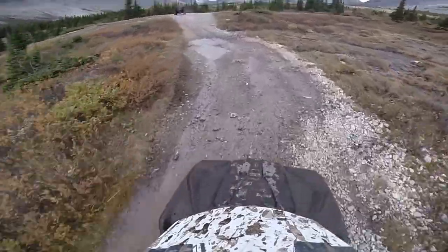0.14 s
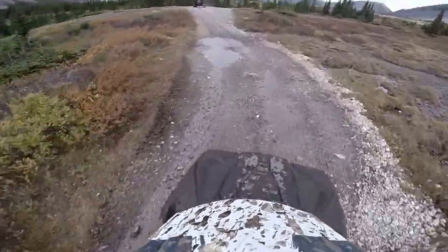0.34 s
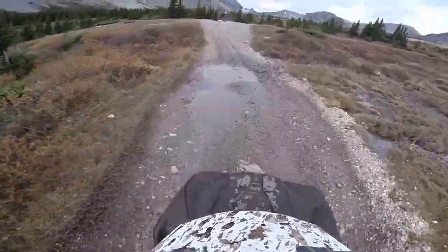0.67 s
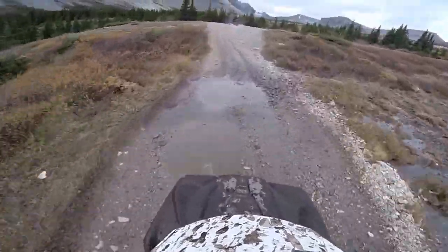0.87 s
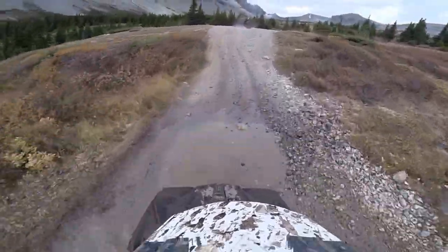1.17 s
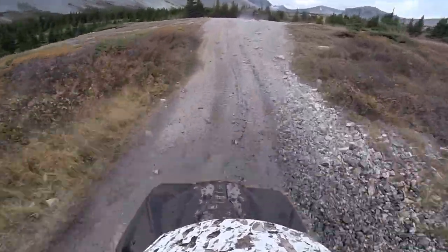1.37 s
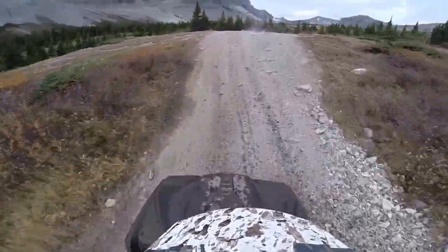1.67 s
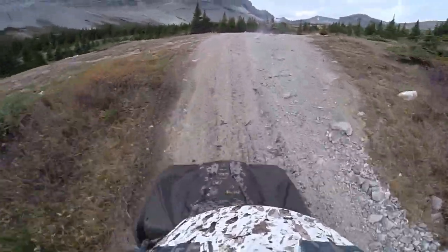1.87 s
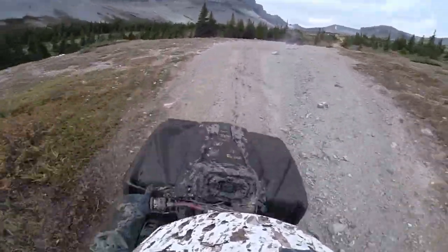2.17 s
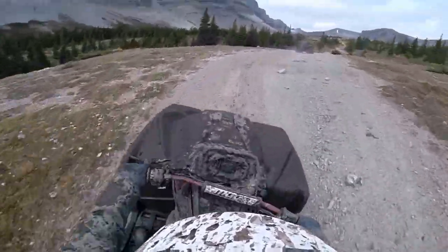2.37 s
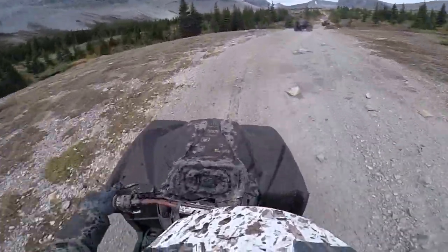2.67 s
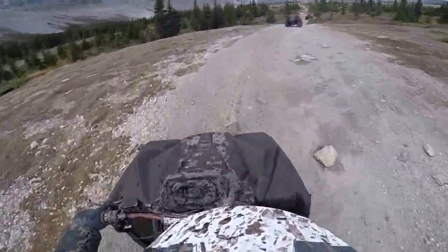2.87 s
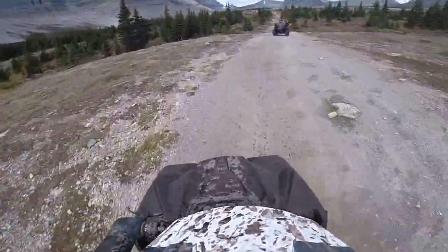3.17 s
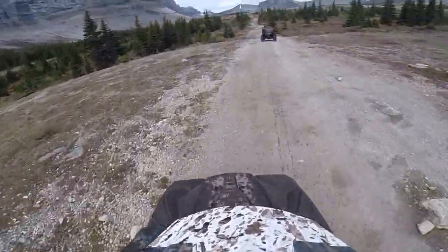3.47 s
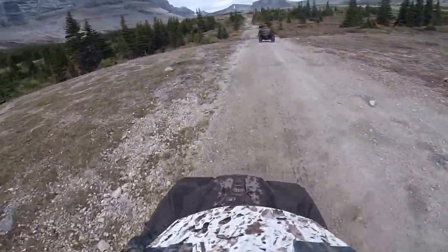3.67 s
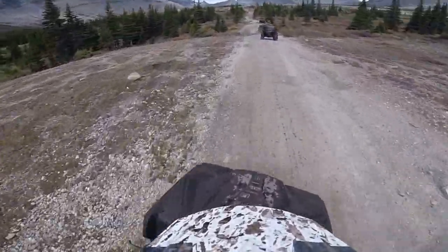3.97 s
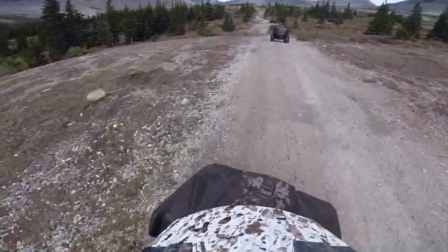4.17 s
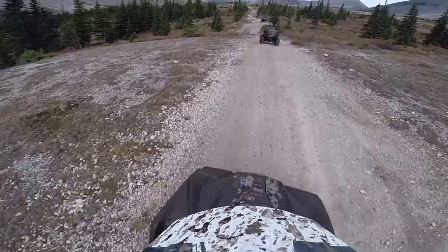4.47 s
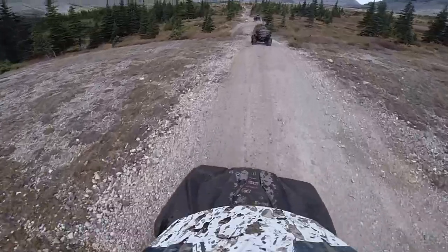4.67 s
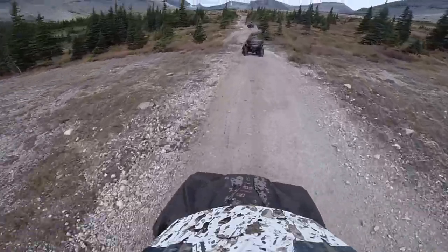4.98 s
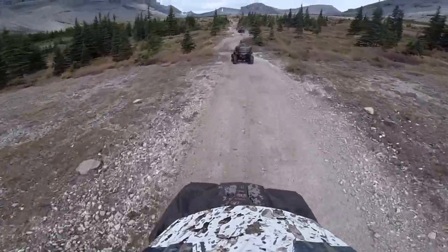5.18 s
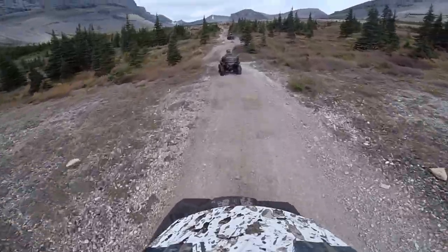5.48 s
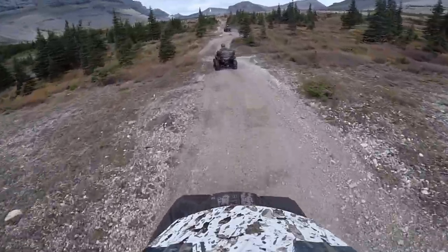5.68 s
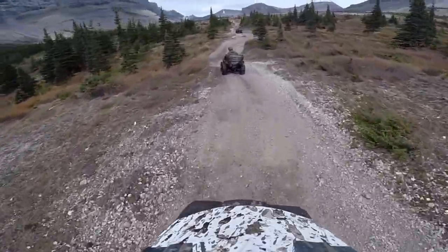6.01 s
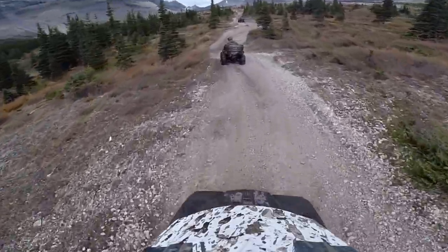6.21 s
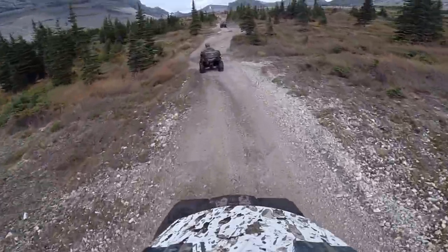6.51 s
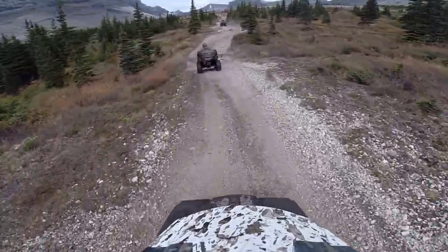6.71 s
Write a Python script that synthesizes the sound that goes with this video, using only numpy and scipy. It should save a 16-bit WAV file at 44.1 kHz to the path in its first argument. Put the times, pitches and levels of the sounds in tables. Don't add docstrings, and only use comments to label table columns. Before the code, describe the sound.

A quad engine, close and boxy through a closed camera case on the helmet, runs along an open gravel trail. From 0 to 2 s the throttle is blipped in short bursts, uneven firing throbbing and barking with a raspy intake, while low bumps thud and grit hisses. Stones clatter lightly near 0.7 and 1.0 s. From 2.0 to 2.8 s the revs climb highest, with a hard stone knock at 2.25. They drop to a low growl by 3.4, with a dull rap near 3.15, then surge until 3.9. Two shorter blips follow, ending near 4.7, with stones around 4.3. After that the throttle stays shut: a sharp panel hit at 4.9, then the chug sinks steadily, a loose part taps rapidly, and faint gear whines slide mostly downward. Bumps fade, returning softly after 6.4. Light hiss continues until the end near 6.9 s.

```python
import sys
import numpy as np
from scipy import signal
from scipy.io import wavfile
from scipy.ndimage import uniform_filter1d

SR = 44100
rng = np.random.default_rng(int(sys.argv[2]) if len(sys.argv) > 2 else 0)


def natural_amplitude(level_db):
    exponent = np.asarray(level_db, float) / 20
    return 10 ** exponent


def digitize_waveform(pressure):
    field = np.atleast_2d(pressure).T
    bounded = np.clip(field, -1, 1)
    quanta = np.round(bounded * 32767).astype(np.int16)
    wavfile.write(sys.argv[1], SR, quanta)


N = 302085


def rms_one(x):
    return x / np.sqrt(np.mean(x ** 2) + 1e-20)


def drift(rate):
    r = np.exp(-80 * np.pi * rate / SR)
    slow = signal.lfilter([1], [1, -2 * r, r * r], rng.standard_normal(N // 40 + 2002))[2000:]
    return np.interp(np.arange(N) / 40, np.arange(len(slow)), rms_one(slow))


def resonate(x, hz, width_hz):
    r = np.exp(-np.pi * width_hz / SR)
    poles = [1, -2 * r * np.cos(2 * np.pi * hz / SR), r * r]
    return signal.lfilter([(1 - r * r) / 2, 0, (r * r - 1) / 2], poles, x)


def ring(clicks, hz, t60):
    r, w = natural_amplitude(-60 / (t60 * SR)), 2 * np.pi * hz / SR
    return signal.lfilter([0, np.sin(w)], [1, -2 * r * np.cos(w), r * r], clicks + 1e-18)


def cut(x, hz, kind, order=4):
    return signal.sosfilt(signal.butter(order, hz, kind, fs=SR, output="sos"), x)


def evened(x, share=1):
    x = rms_one(x)
    return x / (uniform_filter1d(x ** 2, size=3500) + 1e-12) ** (np.clip(share, 0, 1) / 2)


def banded_noise(spectrum, patchy_db):
    hz, db = np.transpose(spectrum)
    edges = hz[0] * 2 ** np.arange(0, np.log2(hz[-1] / hz[0]), 1 / 4)
    out, white = 0, rng.standard_normal((2, N))
    for k, (low, high) in enumerate(zip(edges, edges[1:])):
        level_db = np.interp(np.log(low * high) / 2, np.log(hz), db) + patchy_db * drift(9.7)
        out = out + natural_amplitude(level_db) * cut(white[k % 2], [low, high], "band", order=2)
    return rms_one(out)


# opens in seconds, shuts in seconds, cycles per s on opening,
# cycles per s aimed at on shutting.
BLIPS = [(-.2, -.02, 41, 42.1), (.1, .245, 38.6, 43.2), (.5, .71, 36.4, 44.2), (.715, .92, 43.9, 46.2),
         (1.06, 1.215, 40.4, 45), (1.35, 1.45, 39.2, 40.9), (1.66, 1.865, 39.9, 42.9),
         (1.98, 2.46, 38.8, 54.2), (2.57, 2.8, 49.4, 49.6), (3.43, 3.87, 30.2, 47.7),
         (4.055, 4.245, 38, 43.1), (4.46, 4.665, 34.2, 37.9)]
EASED_UNTIL_S = 2.7


def glide(s, length, tau):
    return (1 - np.exp(-np.clip(s, 0, length) / tau)) / (1 - np.exp(-length / tau))


def revs():
    climb_s, eased_drop_s, shut_drop_s = 1.2, .6, .14
    coast_hz, sag_hz_per_s = 30.8, 2.3
    belt_holds_hz, flywheel_s = 49.4, .04
    now = np.arange(N) / SR
    out = np.zeros(N)
    following = BLIPS[1:] + [(N / SR, 0, coast_hz, 0)]
    for (opens, shuts, low, high), (reopens, _, end, _) in zip(BLIPS, following):
        drop_s = eased_drop_s if shuts < EASED_UNTIL_S else shut_drop_s
        climb = low + (high - low) * glide(now - opens, shuts - opens, climb_s)
        drop = high + (end - high) * glide(now - shuts, reopens - shuts, drop_s)
        out = np.where(now >= opens, climb, out)
        out = np.where(now >= shuts, drop, out)
    last_shut = BLIPS[-1][1]
    out = np.minimum(out - sag_hz_per_s * np.maximum(now - last_shut, 0), belt_holds_hz)
    return uniform_filter1d(out, size=round(flywheel_s * SR))


PUSH = [0.12, 1.08, 0.94, 0.96, 0.81, 1.34, 0.89, 1.16, 0.67, 0.9, 0.98, 1.2]


def opening():
    ahead_s, open_s, shut_s = 0.018, 0.091, .065
    now = np.arange(N) / SR + ahead_s
    pushes = []
    for share, (opens, shuts, _, _) in zip(PUSH, BLIPS):
        travel = np.minimum((now - opens) / open_s, 1 + (shuts - now) / shut_s)
        pushes.append(share * np.clip(travel, 0, 1))
    return np.max(pushes, axis=0)


# time in seconds, peak in dB.
LOUD_TAPS = [(4.767, -32), (5.056, -31), (5.2574, -33.5), (5.292, -36), (5.326, -31.5), (5.361, -34),
             (5.4636, -34.5), (5.498, -31.5), (5.567, -33), (5.637, -29.5), (5.7777, -30.5), (5.8122, -36),
             (5.919, -35), (5.955, -32), (6.026, -37), (6.1, -38), (6.137, -35), (6.1734, -35),
             (6.2486, -34.5), (6.286, -35.5), (6.3619, -34), (6.4, -33), (6.436, -35.5), (6.5488, -34.5),
             (6.587, -32.5), (6.625, -32.5), (6.7013, -31), (6.818, -35)]


def crank(per_s):
    cycles = np.cumsum(per_s * (1 + 0.00147 * drift(7.2))) / SR
    at = np.round(np.array(LOUD_TAPS)[:, 0] * SR).astype(int)
    whole = np.cumsum(np.round(np.diff(cycles[at], prepend=cycles[at[0]])))
    nudge = np.interp(np.arange(N), at, whole - cycles[at])
    return cycles + uniform_filter1d(nudge, size=4000, mode="nearest")


# time in seconds, gain in dB.
LEAN = [(0, 1), (.4, 0.5), (.6, 1), (1.0, 0), (1.14, 1.5), (1.3, 1), (1.55, 2), (1.9, 1), (2.3, 2),
        (2.74, 1), (2.84, 1.6), (3.1, 3), (3.4, 2.5), (3.8, 1.15), (4.3, 0), (4.55, -0.5), (5.0, 0.5),
        (6.85, 0)]


def level(law, pushed, per_s):
    shut_db, open_db, db_per_rev, lean_share = law
    s, lean_db = np.transpose(LEAN)
    lean = np.interp(np.arange(N) / SR, s, lean_db)
    return shut_db + open_db * pushed + db_per_rev * (per_s - 40) + lean_share * lean


BLOWS_PULLING = [(0, 1.0), (.16, 1.29), (.54, 1.11)]
BLOWS_COASTING = [(.02, 1.2), (.14, .9), (.24, -.5), (.38, .6), (.47, .65), (.57, -.6), (.93, -.3)]


def lead(k, blows):
    place, height = np.transpose(blows)
    return np.angle(np.sum(height * np.exp(-2j * np.pi * k * place)))


# frequency in Hz, width in Hz, strength of the phase turn.
TURNS = [(88, 24, -2.23), (269, 12, 1.98), (462, 23, 1.08)]


def turned(hz):
    return sum(strength * np.arctan((hz - at) / width) for at, width, strength in TURNS)


# frequency in Hz, gain in dB.
SILENCER = [(20, -17), (60, 13), (100, 6.5), (135, -8.5), (150, -14), (161, -25), (168, -10), (178, -7.5),
            (192, -2.5), (215, 4.5), (245, -2), (275, -4.5), (310, -3), (380, -8), (440, -8.5),
            (520, -18.5), (1200, -21)]


def silencer_db(hz):
    return np.interp(hz, *np.transpose(SILENCER))


def order_db(k, pattern, rate_hz, otherwise=None):
    if k not in dict(pattern):
        return otherwise
    return dict(pattern)[k] - silencer_db(k * rate_hz)


PULLING_HZ, FREE_HZ, LUGGING_HZ, CRAWLING_HZ = 49.3, 46.5, 41.5, 36.5
# order, level in dB.
PULLING = [(1, -16), (2, -4), (3, -12), (4, -7.5), (5, 6), (6, 1.5), (7, -20.5), (8, -3), (9, -1.5),
           (10, -10.5), (11, -5.5), (12, -10), (13, -5), (14, -6.5), (15, -68), (16, -9), (17, -35),
           (18, -48), (19, -13), (20, -36), (21, -22), (22, -26), (23, -41), (24, -20)]
# order, level in dB.
LUGGING = [(1, -10), (2, -4), (3, -1), (4, -16), (5, 4.5), (6, 0), (7, 0), (8, -0.5), (9, -2.5), (10, -22),
           (11, -9.5), (12, -15), (13, -29), (14, -6.5), (15, -16), (16, -7), (17, -9), (18, -23),
           (19, -18), (20, -19), (21, -17), (22, -11.5), (23, -44), (24, -30)]
# order, level in dB.
CRAWLING = [(1, -10), (2, 0), (3, -6.5), (4, -3.5), (5, -6), (6, 13.5), (7, 0.5), (8, 4.5), (9, -3.5),
            (10, -17), (11, 1), (12, -5.5)]


def load_db(k, revs_hz):
    free = order_db(k, PULLING, PULLING_HZ)
    low = order_db(k, LUGGING, LUGGING_HZ)
    lowest = order_db(k, CRAWLING, CRAWLING_HZ, low - 1.5)
    return np.interp(revs_hz, [CRAWLING_HZ, LUGGING_HZ, FREE_HZ], [lowest, low, free])


# order, level in dB.
EASED = [(1, -11.5), (2, -8.5), (3, -14), (4, -24.5), (5, -6), (6, 1.5), (7, -10), (8, -10.5), (9, -14),
         (10, -24), (11, -5), (12, -15.5), (13, -52), (14, -17), (15, -42), (16, -12.5), (17, -24),
         (18, -41), (19, -29), (20, -45), (21, -31), (22, -20), (23, -24), (24, -54)]


def rest_db(k, revs_hz):
    eased = order_db(k, EASED, 40.2)
    held = order_db(k, PULLING, PULLING_HZ) - 1.5 * max(k - 6, 0)
    return np.interp(revs_hz, [FREE_HZ, PULLING_HZ], [eased, held]) - 0.5


IDLING_HZ, COASTING_HZ, OVERRUN_HZ, FALLING_HZ = 26.8, 28.9, 30.6, 37.5
# order, level in dB.
IDLING = [(1, -5), (2, -1), (3, 3), (4, -18), (5, -7.5), (6, -25), (7, -10), (8, -2), (9, -0.5), (10, -7.5),
          (11, -26), (12, -11.5), (13, -19), (14, -17.5), (15, -9.5), (16, -23), (17, -13), (18, -21)]
# order, level in dB.
COASTING = [(1, -36), (2, 1.5), (3, 5), (4, -15), (5, -3.5), (6, -8.5), (7, -1.5), (8, -2), (9, -3),
            (10, -7), (11, -10), (12, -15), (13, -24.5), (14, -11.5), (15, -7), (16, -28), (17, -36),
            (18, -21), (19, -53), (20, -18.5), (21, -32), (22, -21), (23, -18.5), (24, -37.5)]
# order, level in dB.
OVERRUN = [(1, -25), (2, -0.5), (3, 0.5), (4, -13), (5, -12), (6, 2), (7, -12), (8, -4.5), (9, 0), (10, -3),
           (11, -24), (12, -12)]
# order, level in dB.
FALLING = [(1, -10), (2, -6.5), (3, 3), (4, -7), (5, -1.5), (6, 5), (7, -4.5), (8, -1), (9, -6), (10, -21),
           (11, -10.5), (12, -5.5)]


def drag_db(k, revs_hz):
    idling_db = 6
    shut = order_db(k, COASTING, COASTING_HZ)
    idling = order_db(k, IDLING, IDLING_HZ, shut - idling_db) + idling_db
    overrun = order_db(k, OVERRUN, OVERRUN_HZ, shut)
    falling = order_db(k, FALLING, FALLING_HZ, shut)
    rates = [IDLING_HZ, COASTING_HZ, OVERRUN_HZ, FALLING_HZ]
    return np.interp(revs_hz, rates, [idling, shut, overrun, falling]) - 2


def exhaust(cycles, per_s, throttle, pushed, bark_db, throb_db):
    now = np.arange(N)
    resting = np.clip((EASED_UNTIL_S - now / SR) / .05, 0, 1) * (1 - throttle)
    slow = now[::64]
    revs_hz, opened, eased = per_s[slow], throttle[slow], resting[slow]
    shut = 1 - opened - eased
    bark, throb, turn, step = 0, 0, 1, np.exp(2j * np.pi * cycles)
    for k, _ in PULLING:
        turn = turn * step
        hz = k * revs_hz
        brighter_db = (k > 6) * 5 * (pushed[slow] - 1)
        firing = opened * natural_amplitude(load_db(k, revs_hz) + brighter_db) + eased * natural_amplitude(rest_db(k, revs_hz))
        firing_phase = lead(k, BLOWS_PULLING) + turned(hz) - turned(k * PULLING_HZ)
        drag = shut * natural_amplitude(drag_db(k, revs_hz))
        drag_phase = lead(k, BLOWS_COASTING) + .5 * (turned(hz) - turned(k * COASTING_HZ))
        blend = firing * np.exp(1j * firing_phase) + drag * np.exp(1j * drag_phase)
        blend = blend * natural_amplitude(silencer_db(hz) + (.6 + .5 * opened) * drift(3)[slow])
        order = np.real(np.interp(now, slow, blend) * turn)
        above = np.clip((k * per_s - 145) / 20, 0, 1)
        bark = bark + above * order
        throb = throb + (1 - above) * order
    bark_db = bark_db + 1.7 * np.exp(-((per_s - 34.6) / 2.2) ** 2)
    throb_db = throb_db - 5 * resting
    uneven = natural_amplitude(0.7 * drift(28))
    return uneven * (natural_amplitude(bark_db) * evened(bark, 0.88) + natural_amplitude(throb_db) * evened(throb))


def puffs(cycles, throttle, rasp_db):
    clicks = 0
    for place, height in BLOWS_PULLING:
        clicks = clicks + height * np.diff(np.floor(cycles - place), prepend=np.floor(cycles[0] - place))
    edge = cut(clicks * natural_amplitude(3.6 * drift(64)) + 1e-18, [565, 2690], "band", order=2)
    edge = edge + natural_amplitude(16.0) * resonate(edge, 846, 55) + natural_amplitude(3.5) * resonate(edge, 1190, 220)
    return throttle * natural_amplitude(rasp_db - 9.5) * rms_one(edge)


# frequency in Hz, level in dB, t60 in seconds.
TAP_MODES = [(1490, -21, 0.01), (1557, -10, 0.027), (1612, -12.5, 0.054)]


def taps(cycles, tap_db):
    main = np.diff(np.floor(cycles), prepend=np.floor(cycles[0]))
    rebound = np.diff(np.floor(cycles + .58), prepend=np.floor(cycles[0] + .58))
    clicks = (main + natural_amplitude(-9) * rebound) * natural_amplitude(tap_db + np.clip(1.5 * drift(30), -5, 2))
    s, db = np.transpose(LOUD_TAPS)
    knocks = np.flatnonzero(main)
    nearest = np.argmin(np.abs(knocks[:, None] - s * SR), axis=0)
    clicks[knocks[nearest]] = natural_amplitude(db)
    now = np.arange(56) / 56
    contact = np.sin(np.pi * now) ** 2 * np.sin(2 * np.pi * 2 * now) / 14
    soft = natural_amplitude(8) * np.convolve(clicks, contact)[:N]
    return sum(natural_amplitude(db) * ring(soft * natural_amplitude(1.3 * drift(20)), hz, t60) for hz, db, t60 in TAP_MODES)


# frequency in Hz, density in dB per Hz.
RASP = [(310, 3), (520, -7), (632, -2), (731, -9), (767, -10.5), (902, -5), (1030, -12.5), (1480, -2.5),
        (1780, -2), (2040, -9.5), (2520, -6.5), (3600, -28), (4680, -55), (7920, -120)]
# frequency in Hz, density in dB per Hz.
ROAR = [(45, -21), (63, -4), (90, -14), (160, -15), (230, -10.5), (330, -19.5), (450, -20), (650, -48)]
# frequency in Hz, density in dB per Hz.
HISS = [(1710, -1), (2900, 3), (3090, -13), (3370, -11.5), (4120, 2.5), (4480, -4.5), (4860, 0),
        (5350, -13.5), (5730, -13), (6720, -13), (8430, -26.5), (10700, -38), (15000, -54)]
# frequency in Hz, width in Hz, level in dB.
CASE = [(893, 34, 4.5), (1212, 67, -1), (1766, 93, 0), (2350, 670, -8.5), (2430, 17, -4), (1547, 67, -2),
        (4730, 310, -8.5), (5770, 300, 0.5), (7000, 120, -5)]


def running_noise(cycles, throttle, rasp_db, hiss_db):
    gate = natural_amplitude(0.98 * np.cos(2 * np.pi * cycles) + 0.15 * np.cos(4 * np.pi * (cycles + 0.5)))
    rasp = natural_amplitude(rasp_db - 5.0 + 0.31 * throttle) * rms_one(gate * banded_noise(RASP, patchy_db=1.0))
    rasp = rasp - .7 * (1 - throttle) * resonate(rasp, 1600, 600)
    pulse_db = 7 * (1 - throttle) * np.cos(2 * np.pi * (cycles - .25))
    roar = natural_amplitude(.85 * rasp_db - 15.5 + pulse_db) * banded_noise(ROAR, patchy_db=1.1)
    grain = natural_amplitude(0.63 * drift(150))
    hiss = natural_amplitude(hiss_db + 1.56 + 0.4 * throttle) * rms_one(grain * banded_noise(HISS, patchy_db=1.85))
    treble = hiss - cut(hiss, 4600, "low", order=1)
    hiss = hiss + 0.3 * (throttle - .6) * treble
    noise = rasp + hiss
    intake = throttle * natural_amplitude(0.67) * resonate(noise, 1770, 33)
    cavity = sum(natural_amplitude(db) * resonate(noise, hz, width) for hz, width, db in CASE)
    return roar + noise + intake + cavity


# time in seconds, peak in dB, centre in Hz, spread in octaves, t60 in seconds.
STONES = [(.717, -27.5, 4500, 0.37, 0.14), (1.022, -32.5, 4250, 0.2, 0.089), (1.023, -38, 6460, 0.18, 0.06),
          (1.026, -48, 9750, 0.18, 0.11), (0.751, -43, 5600, 0.17, .09), (3.157, -24, 2000, 0.3, 0.024),
          (4.314, -25, 2170, 0.65, 0.11), (.748, -37.5, 7460, 0.55, 0.15), (1.332, -47, 9000, 0.72, .03),
          (.932, -52, 9000, 0.66, 0.018), (1.786, -37, 7000, 0.7, 0.023), (2.252, -15.5, 2430, 0.17, 0.023),
          (3.275, -31.5, 4600, 0.61, 0.046), (4.295, -46, 6000, 1, .015), (4.304, -37, 5660, .22, 0.09),
          (4.304, -47, 10600, .2, 0.09), (4.331, -30.5, 4440, 0.64, .05), (4.897, -20, 3480, 0.88, 0.051),
          (4.899, -27, 5660, 0.22, 0.067), (4.903, -34, 3900, 0.26, .1), (5.089, -49, 10000, 0.55, .02),
          (5.41, -46, 6500, 0.42, .03)]
# frequency in Hz, level in dB.
PANEL = [(1600, -3), (2000, -2), (2450, 0), (2850, 0), (3860, 0), (4350, -1), (5660, -2), (6500, -7),
         (7050, -6), (8300, -12), (9700, -18), (10600, -20), (12300, -24), (14000, -30)]


def stones():
    size = 4096
    out, now = np.zeros(N + size), np.arange(size) / SR
    for s, db, centre_hz, octaves, t60 in STONES:
        burst = rng.standard_normal(size) * natural_amplitude(-60 * now / max(t60, .005)) * np.minimum(now / 0.0004, 1)
        hit = 0
        for hz, mode_db in PANEL:
            away = np.log2(hz / centre_hz) / max(octaves, .2)
            mode_db = mode_db + 1.5 * rng.standard_normal() - 6 * away ** 2
            hit = hit + natural_amplitude(mode_db) * resonate(burst, hz, .035 * hz)
        hit_top = min(centre_hz * 2 ** (.5 + octaves), 15000)
        hit = cut(hit, [centre_hz / 2.4, hit_top], "band", order=3)
        snap_top = min(centre_hz * 2 ** (1.5 + octaves), 11000)
        snap = cut(burst * natural_amplitude(-60 * now / 0.012), [centre_hz / 2, snap_top], "band", order=2)
        snap_gain = np.clip(3 * octaves - .5, 0, 1) * natural_amplitude(-10)
        at = round(s * SR)
        out[at:at + size] += natural_amplitude(db) * (hit / np.max(np.abs(hit)) + snap_gain * snap / np.max(np.abs(snap)))
    return out[:N]


# time in seconds, level in dB.
BUMPS = [(.14, -30.5), (.33, -31.5), (.58, -33), (.9, -31), (1.24, -32.5), (1.45, -32), (1.73, -28.5),
         (1.9, -37), (2.15, -34), (2.32, -32.5), (2.5, -30.5), (2.66, -32), (2.85, -41), (3.08, -40),
         (3.3, -43), (3.52, -42), (3.87, -33), (4.06, -34), (4.25, -43), (4.45, -41), (4.64, -41),
         (4.9, -48), (5.11, -51), (5.29, -55), (5.9, -62), (6.42, -44), (6.8, -38.5)]


def rumble():
    smooth_db, half_s = -47, 0.098
    shake = rng.standard_normal(N + SR)
    shake = resonate(shake, 29.5, 11.0) + natural_amplitude(-3.5) * cut(shake, [11, 34], "band", order=2)
    now = np.arange(0, N, 64) / SR
    jolts = natural_amplitude(smooth_db) + sum(natural_amplitude(db) * np.exp(-((now - s) / half_s) ** 2) for s, db in BUMPS)
    return np.interp(np.arange(N) / SR, now, jolts) * evened(shake[SR:])


# start in seconds, end in seconds, first pitch in Hz, last pitch in Hz, level in dB.
WHINES = [(3.3, 3.4, 4950, 4880, -55), (5.02, 5.165, 4750, 4540, -56), (5.15, 5.48, 4550, 4120, -55),
          (5.465, 5.83, 4140, 3735, -59), (5.36, 5.4, 4400, 4400, -53), (5.425, 5.465, 4500, 4500, -53),
          (5.53, 5.68, 4570, 4410, -59), (6.05, 6.27, 4600, 4410, -62.5), (6.3, 6.55, 4430, 4600, -63.5),
          (5.85, 6.85, 2390, 2120, -63), (5.05, 6.1, 850, 730, -61), (4.95, 5.7, 725, 672, -60),
          (5.38, 5.53, 5620, 5480, -65), (5.02, 5.3, 5150, 5120, -65)]


def whines():
    out, wander = np.zeros(N), 1 + .005 * drift(60)
    flutter = natural_amplitude(np.clip(3.5 * drift(20), -9, 3))
    for start, end, from_hz, to_hz, db in WHINES:
        span = slice(round(start * SR), min(round(end * SR), N))
        now = np.arange(N)[span] / SR
        fade = np.clip(np.minimum(now - start, end - now) / 0.02, 0, 1)
        hz = np.interp(now, [start, end], [from_hz, to_hz]) * wander[span]
        out[span] += fade * flutter[span] * natural_amplitude(db + 1.5) * np.sin(2 * np.pi * np.cumsum(hz) / SR)
    return out


# centre in seconds, half length in seconds, level in dB.
SPRAY = [
    (0.26, 0.2, -58.5),
    (1.507, 0.27, -59),
    (4.544, 0.4, -67),
]


def spray():
    now = np.arange(N) / SR
    swell = sum(natural_amplitude(db) * np.exp(-((now - s) / half) ** 4) for s, half, db in SPRAY)
    specks = (rng.random(N) < 90 / SR) * natural_amplitude(18 + 2.5 * rng.standard_normal(N))
    fizz = cut(rng.standard_normal(N) + specks, [4500, 10000], "band", order=2) * natural_amplitude(1.7 * drift(37))
    return swell * rms_one(fizz)


# time in seconds, peak in dB.
GRIT = [(0.1092, -50), (0.1381, -45), (0.9283, -49), (1.3314, -46), (2.2378, -42), (4.2358, -44),
        (4.3844, -51), (4.4343, -50), (4.4787, -41), (4.4864, -54), (4.5264, -49), (4.5545, -45),
        (4.5694, -50), (4.9636, -54), (5.035, -56)]


def grit():
    s, db = np.transpose(GRIT)
    clicks = np.zeros(N)
    clicks[np.round(s * SR).astype(int)] = natural_amplitude(db - 1)
    fading = signal.lfilter([1], [1, -natural_amplitude(-60 / (.008 * SR))], clicks + 1e-18)
    return cut(fading * rng.standard_normal(N), [7000, 12500], "band", order=2)


# ticks per second, lead in turns, frequency in Hz, peak in dB, t60 in seconds.
CHAIN = [
    (47.6, .0, 8350, -66, .012),
    (3.64, .75, 12700, -69, .035),
    (3.52, .96, 12700, -69, .035),
]


def chain():
    out, pace = 0, np.cumsum(1 + .01 * drift(1.7)) / SR
    for per_s, turns, hz, db, t60 in CHAIN:
        clicks = np.diff(np.floor(per_s * pace + turns), prepend=0)
        rub = ring(clicks * natural_amplitude(db + 1.5 * drift(10)), hz, t60)
        out = out + rub * natural_amplitude(3 * drift(150))
    return out


# shut at 40 cycles per s in dB, added wide open in dB,
# dB per cycle per s, share of the lean.
BARK_LAW, THROB_LAW = (-32, 4, 0.363, 0.67), (-33, -3, 0.29, 1)
RASP_LAW, HISS_LAW = (-34.5, 0.5, 0.45, 2), (-47.5, 0.5, .5, 1.58)
TAP_LAW = (-36.5, -7.5, 0.24, 1.5)


def scene():
    per_s, pushed = revs(), opening()
    laws = (BARK_LAW, THROB_LAW, RASP_LAW, HISS_LAW, TAP_LAW)
    bark_db, throb_db, rasp_db, hiss_db, tap_db = (level(law, pushed, per_s) for law in laws)
    throttle = np.clip(pushed, 0, 1)
    cycles = crank(per_s)
    engine = exhaust(cycles, per_s, throttle, pushed, bark_db, throb_db)
    engine = engine + puffs(cycles, throttle, rasp_db) + taps(cycles, tap_db) + whines() + chain()
    trail = running_noise(cycles, throttle, rasp_db, hiss_db) + stones() + rumble() + spray() + grit()
    return (engine + trail)[None]


def roll_off(x):
    return signal.sosfilt(signal.butter(12, 15190, fs=SR, output="sos"), x)


def record(dry):
    top = .55
    rounded = top * np.tanh(dry / top)
    hiss = cut(rng.standard_normal(N), [7000, 13500], "band", order=2)
    return roll_off(cut(rounded, 15000, "low", order=12) + natural_amplitude(-72) * hiss)


dry = scene()
out = record(dry)
digitize_waveform(out)
```